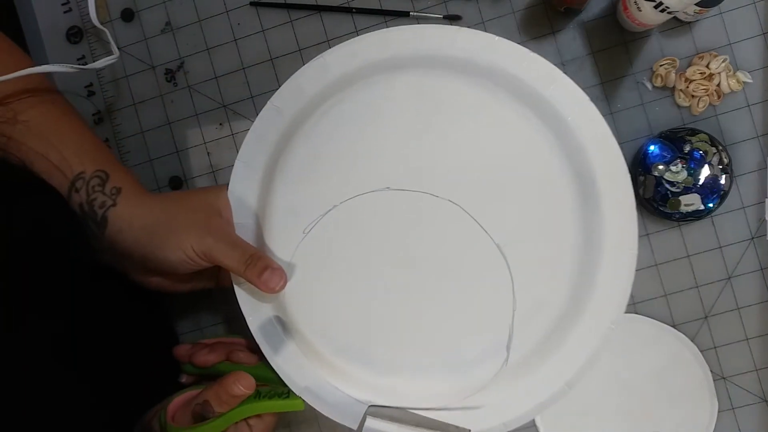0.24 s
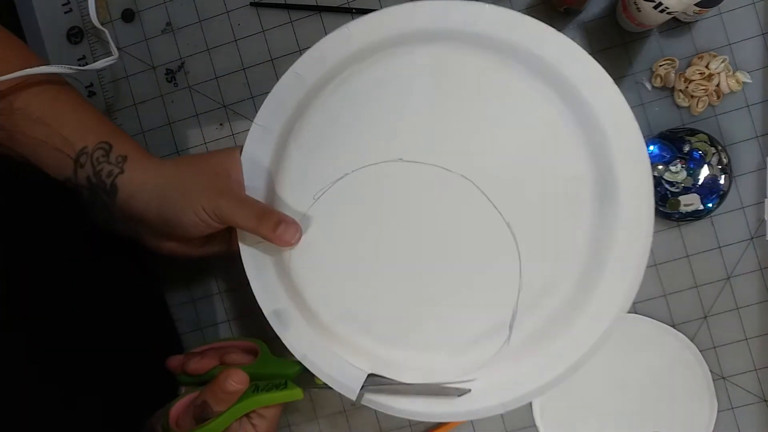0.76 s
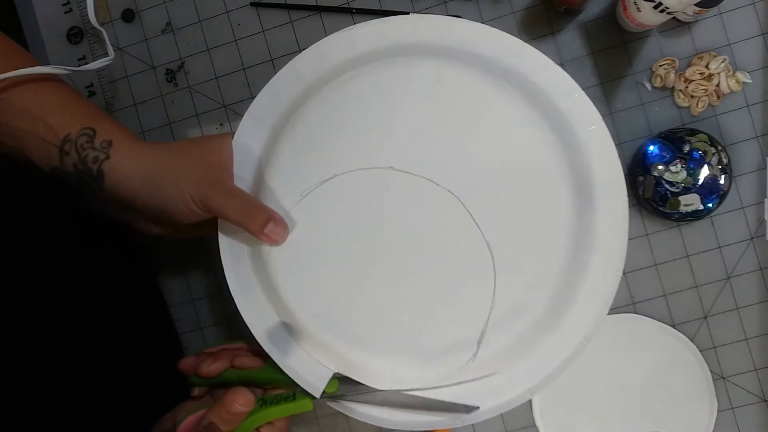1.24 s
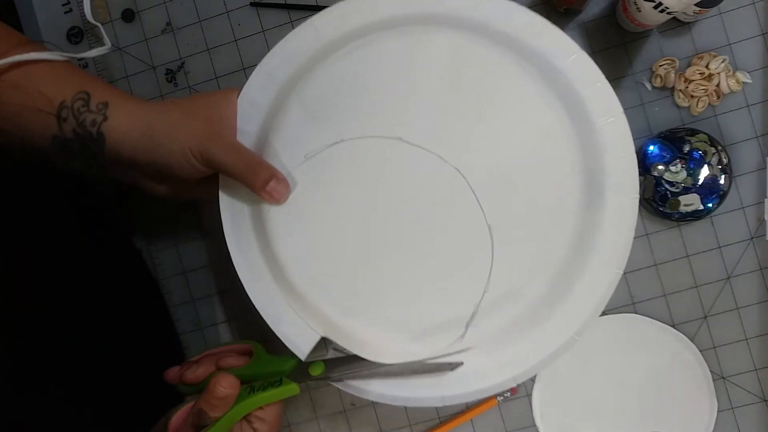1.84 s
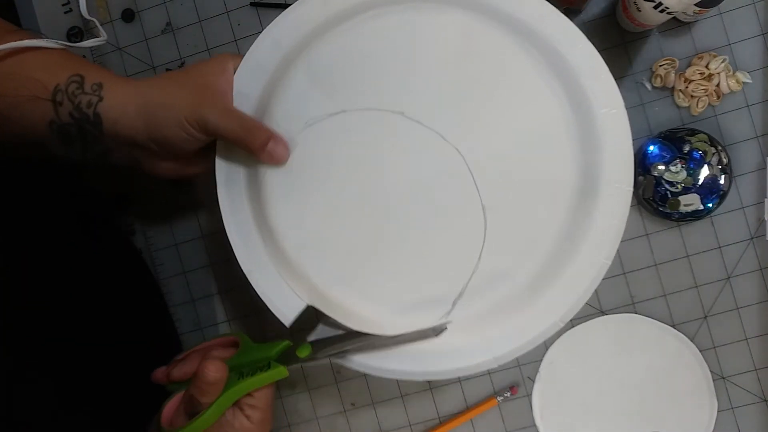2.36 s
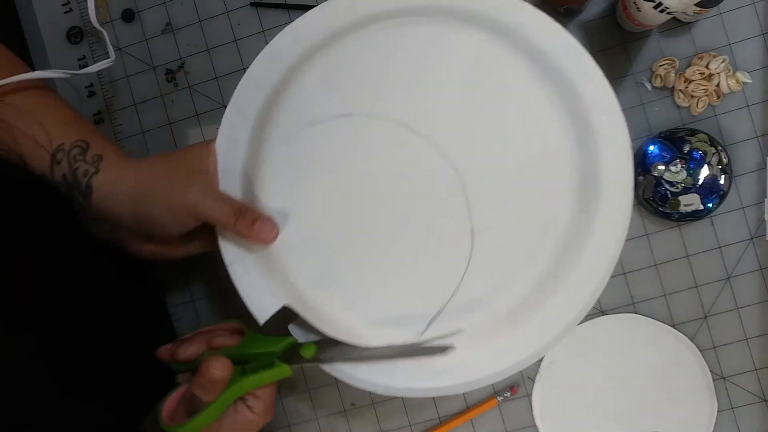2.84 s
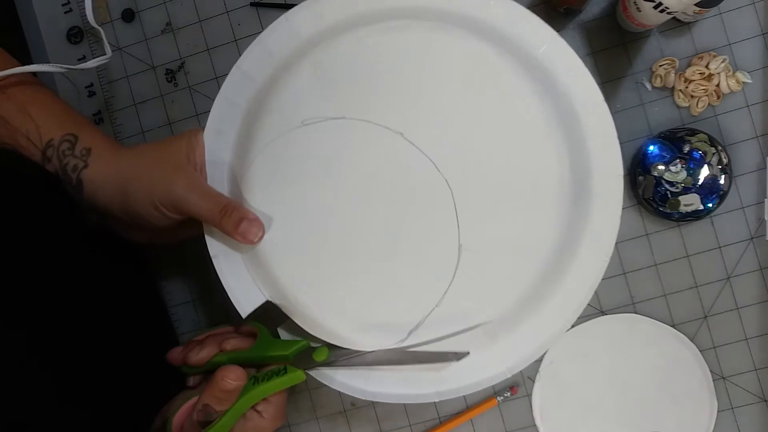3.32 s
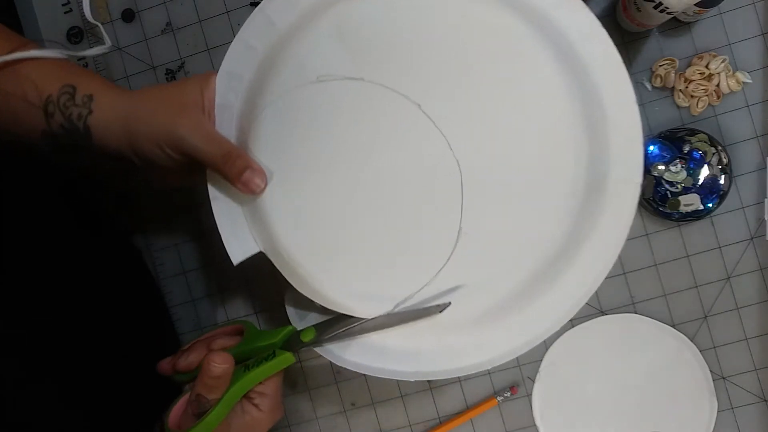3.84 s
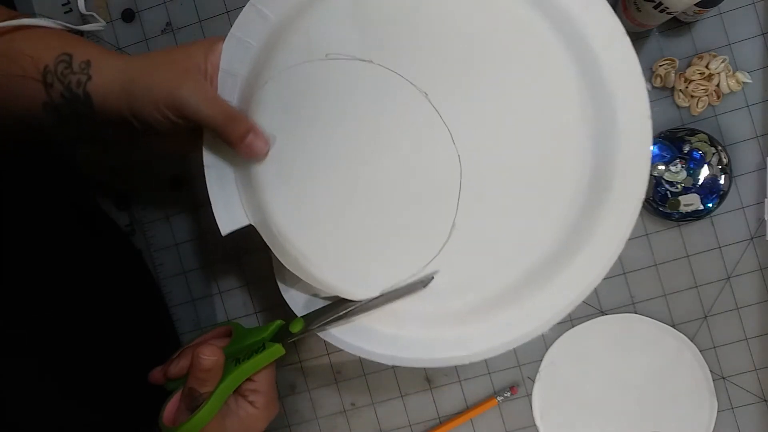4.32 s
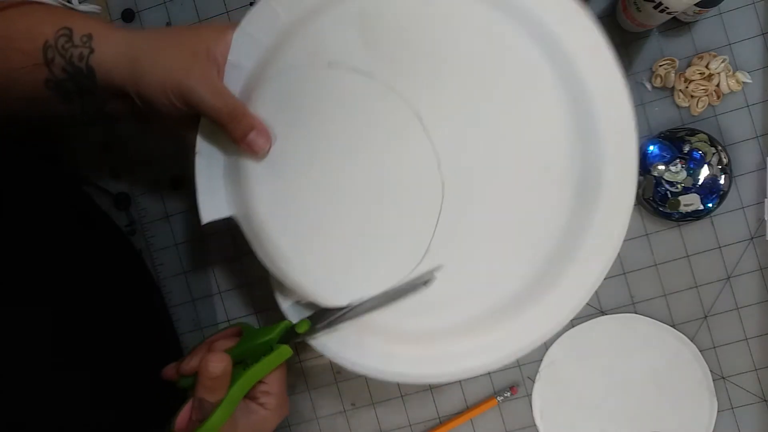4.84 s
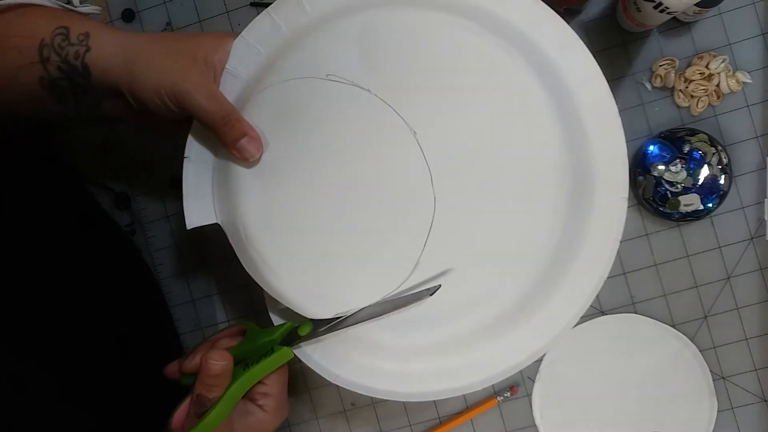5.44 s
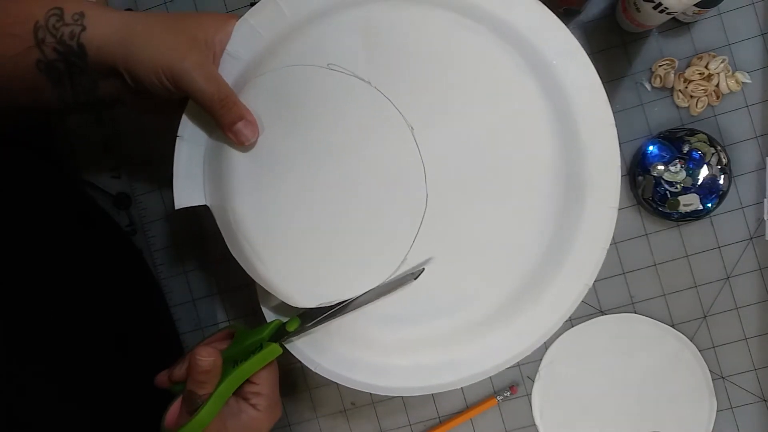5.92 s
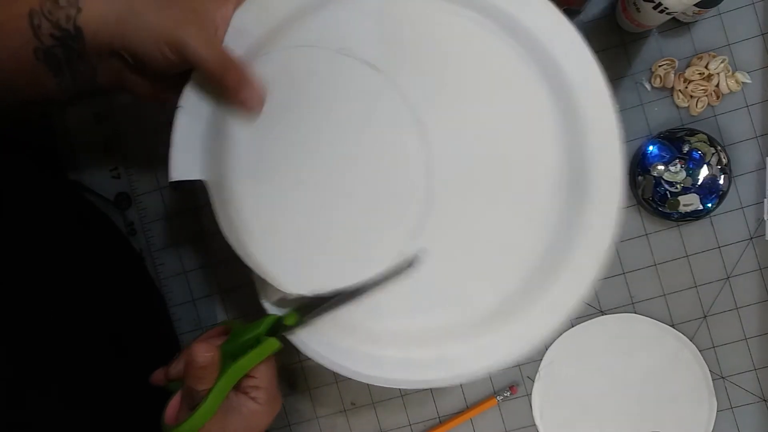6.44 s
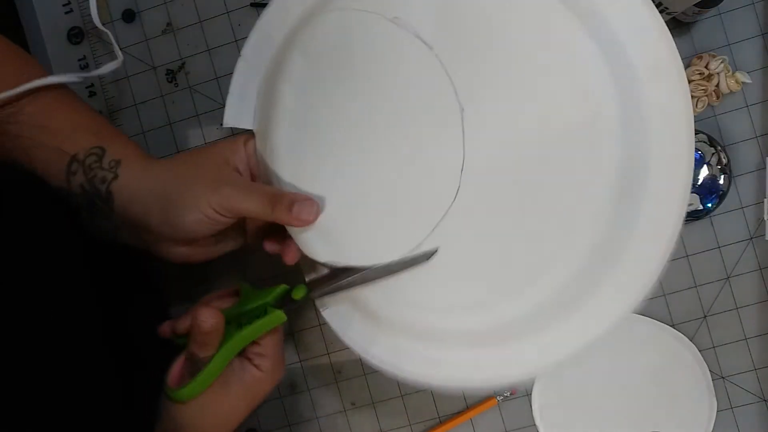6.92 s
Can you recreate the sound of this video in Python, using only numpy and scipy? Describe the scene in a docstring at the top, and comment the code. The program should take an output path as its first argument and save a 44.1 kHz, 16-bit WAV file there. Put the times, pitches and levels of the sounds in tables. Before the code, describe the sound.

Close to the microphone in a quiet room, scissors bite through a stiff paper plate. Short hollow snaps with ragged tearing come in uneven clusters, with dry scrapes as the open blades slide along the slit. A pause follows three seconds, then lighter snips, and a loud, dense burst around six seconds before it thins out. Faint hush lies underneath.

```python
"""In a quiet room, scissors cut a stiff paper plate close to a microphone.
As the blades close, the card gives way in short snaps: a jolt and ragged tearing ring the plate
and its cut edge. Between cuts the open blades slide along the slit with a dense scrape of tiny
catches. Faint fidgeting and brief rustles, short echoes and a steady hush lie underneath."""
import sys
import numpy as np
from scipy import signal
from scipy.fft import rfft, irfft
from scipy.io import wavfile
from scipy.ndimage import uniform_filter1d

SR = 44100
rng = np.random.default_rng(int(sys.argv[2]) if len(sys.argv) > 2 else 0)


def to_wav(s):
    """Save 16-bit WAV."""
    ch = np.atleast_2d(s).T  # columns
    pcm = np.round(np.clip(ch, -1, 1) * 32767)  # PCM
    wavfile.write(sys.argv[1], SR, pcm.astype(np.int16))


N = 316197

# Room and microphone noise, spectral shape: pitch_hz, relative density_db (dB per Hz)
HUSH_SPECTRUM = [(24, -64), (40, -50), (96, -22), (422, -15), (1410, -27.5), (2630, -29), (4800, -32),
                 (8130, -40), (12100, -36), (16000, -36)]
# Bending modes of the whole plate: pitch_hz, width_hz, relative level_db
PLATE_MODES = [(315, 143, -2.5), (426.6, 79, 4), (542, 41.5, 1.5), (665.4, 43, 0.5), (820, 66, 1),
               (1119, 57, -4), (1508, 66, -6)]
# Stiffer modes near the cut and in the blades: pitch_hz, width_hz, relative level_db
EDGE_MODES = [(1625, 142, 18), (1780, 49, 22.5), (2110, 227, 19), (3170, 100, 22), (4607, 730, 12),
              (6560, 530, 2)]
# Tearing fibres, spectral shape: pitch_hz, relative density_db (dB per Hz)
FIBRE_SPECTRUM = [(530, -31), (900, 10), (1410, -5.5), (2090, -4.5), (2600, 0), (4740, 0.5), (8150, -14),
                  (10100, -10), (16000, -22.5)]
# Card shifting on the blades: start_s, scrape level_db, time to peak_ms
RUSTLES = [(0.0044, -44, 5.5), (0.09, -51, 5.3), (0.596, -46.5, 12), (1.198, -46.5, 3.6), (1.327, -50, 7.4),
           (1.3607, -48, 1.9), (1.441, -60, 8.7), (1.694, -55, 11.3), (1.749, -51.5, 2.4),
           (1.843, -52, 5.4), (2.55, -59.5, 3.2), (3.264, -56, 7.8), (3.3425, -57, 7.2),
           (3.6064, -47.5, 6.2), (3.764, -53, 3.5), (3.851, -41.5, 9.6), (3.913, -43, 9.6),
           (3.966, -47, 4.1), (4.092, -61, 7.1), (4.469, -56.5, 9.8), (5.0936, -52, 5.4),
           (5.117, -50.5, 4.5), (5.245, -49, 3.2), (6.721, -48, 7), (6.758, -51, 3.8)]
# Blades or fingers sliding on card: start_s, length_s, scrape level_db, change by the end_db,
# change in the middle_db, plate drumming against scrape_db, favoured pitch_hz, lift of low edge modes_db
STROKES = [(0.788, .26, -39.5, 6, -5.5, -5, 750, 9), (2.395, 0.22, -58, 8, -12.5, -10, 800, -4),
           (2.591, 0.096, -54, -5.5, 10, -4, 594, -2), (2.707, 0.31, -36.5, -1.5, -6, -1.5, 710, -4.5),
           (4.724, 0.23, -45.5, 5.5, -4, -3.5, 800, -12), (6.394, 0.12, -56, -1, 8.5, -10.5, 794, -1),
           (6.658, 0.097, -54, 10, 4.5, -4.5, 850, -19), (6.778, 0.27, -60.5, 6, -19, 3, 810, 13),
           (6.881, 0.33, -45, -12, 3, -6, 655, -3.5)]
# The card giving way, and among these rows some knocks of the sliding blades on the plate: start_s, thud
# level_db, favoured plate pitch_hz, crack against thud_db
SNAPS = [(0.049, -29.5, 525, -2.5), (0.069, -36.5, 820, -4), (0.106, -39, 1120, -1),
         (0.171, -24.5, 520, -8), (0.242, -23.5, 710, -9), (0.373, -34, 506, -6.5), (0.386, -23, 636, 0.5),
         (0.58, -23.5, 790, -2.5), (0.614, -29, 570, 3.5), (0.638, -40.5, 1020, 5.5), (0.814, -39, 1100, 5),
         (0.844, -25.5, 750, -25), (1.197, -40.5, 760, -6.5), (1.233, -27, 716, -10),
         (1.322, -27, 475, -10.5), (1.399, -44, 600, 8.5), (1.57, -38, 650, -0.5), (1.704, -40, 764, 1),
         (2.046, -21.5, 627, -9.5), (2.135, -38, 450, -5.5), (2.202, -23.5, 450, -9.5),
         (2.27, -35.5, 493, -3), (2.323, -42, 470, 2), (2.356, -32, 493, -3.5), (2.382, -27.5, 433, -7),
         (2.799, -23.5, 664, -32), (2.884, -26.5, 600, -9), (2.93, -27.5, 500, -10),
         (3.616, -29.5, 650, -3), (3.667, -30.5, 590, 1), (3.816, -43, 404, 4.5), (3.861, -25, 835, -13),
         (3.928, -25.5, 755, -13), (4.004, -37, 730, -2.5), (4.133, -33.5, 670, -4.5),
         (4.171, -29, 460, -6), (4.223, -31, 443, -6.5), (4.262, -31, 544, -5.5), (4.308, -31, 770, -8),
         (4.377, -39.5, 507, -2.5), (4.503, -44.5, 520, 0), (4.572, -34, 555, -9.5), (4.776, -29, 730, -8),
         (4.817, -31, 940, -7), (4.884, -36, 624, -1), (5.161, -38.5, 423, -4), (5.256, -34, 430, -8.5),
         (5.284, -32, 472, -7), (5.335, -31, 381, -6.5), (5.453, -28, 407, -5.5), (5.521, -20, 512, -13),
         (5.574, -36, 505, -5.5), (5.603, -30, 388, -7), (5.694, -38.5, 670, -6), (5.741, -24.5, 414, -6.5),
         (5.86, -15, 454, -12.5), (5.9, -22, 430, -14.5), (5.98, -19, 430, -10), (6.053, -23, 468, -12),
         (6.083, -22.5, 430, -6.5), (6.14, -24.5, 475, -10), (6.22, -35.5, 820, -6),
         (6.2509, -15, 440, -11.5), (6.435, -36.5, 756, 2), (6.476, -37, 830, -4), (6.611, -45.5, 480, 1.5),
         (6.828, -40, 800, -18), (6.934, -25.5, 680, -15), (6.998, -34.5, 440, -9), (7.079, -38.5, 483, 2)]
# Crack colour as the cut moves round the plate: time_s, upper treble lift_db, lift of low edge modes_db
SHARPNESS = [(0, -18, 19.5), (2.2, 1, 1), (3.2, -4, -2), (4.3, 3.5, 10.5), (5.8, -1, -1.5), (6.3, -4, 0)]

HUSH_DB = -64.5  # before the microphone's bass cut
LOW_EDGE_HZ = 3500  # edge modes below this count as low
SLIDE_FALL_DB = -5  # mode level per squared octave away from the favoured pitch of a slide
ATTACK_S, RELEASE_S, QUIET_DB = 0.028, 0.082, -26  # a stroke swells out of quiet and dies away
TEAR_MS, CRACK_MS = 5.5, 3.29  # how long a snap shakes the plate; decay time of its crack
THUMP_HZ, THUMP_DB = 219, -18.5  # the whole plate jumps in the hand at each snap
BAND_LIMIT_HZ = 15850


def gain_of(db):
    """Decibels to amplitude."""
    return 10 ** (np.asarray(db) / 20)


def evened(x):
    """Scales to rms 1."""
    return x / np.sqrt(np.mean(x ** 2) + 1e-20)


def filtered(x, taps):
    """Filters with taps of unit energy, so white noise keeps its power."""
    return signal.oaconvolve(x, taps / np.linalg.norm(taps))[:len(x)]


def spectrum_gain(hz, points):
    """Reads a spectrum of (Hz, dB) points as gains, straight in dB against log pitch."""
    point_hz, db = np.transpose(points)
    return gain_of(np.interp(np.log(hz + 1), np.log(point_hz + 1), db))


def colour(x, points):
    """Causal filter with a given spectrum, so nothing sounds before a click."""
    log_gain = np.log(spectrum_gain(np.fft.rfftfreq(512, 1 / SR), points))
    full = np.r_[log_gain, log_gain[-2:0:-1]]
    minimum_phase = -signal.hilbert(full).imag
    return filtered(x, np.fft.ifft(np.exp(full + 1j * minimum_phase)).real)


def ring(x, hz, width_hz):
    """One decaying mode, gain 1 at its peak; a wider mode dies faster."""
    r = np.exp(-np.pi * width_hz / SR)
    return 2 * signal.lfilter([1 - r], [1, -r * np.exp(2j * np.pi * hz / SR)], x).real


def slow_drift(samples):
    """Smooth random wander of rms 1; more samples make it slower."""
    noise = rng.standard_normal(N)
    return evened(uniform_filter1d(uniform_filter1d(noise, size=samples), size=samples))


def hush():
    """Steady room and microphone noise, wavering slightly in level."""
    hz = np.fft.rfftfreq(N, 1 / SR)
    noise = irfft(rfft(rng.standard_normal(N)) * spectrum_gain(hz, HUSH_SPECTRUM), N)
    waver_db = evened(uniform_filter1d(rng.standard_normal(N), size=4000))
    return gain_of(HUSH_DB + waver_db) * evened(noise)


def room(x, t60_s=0.13):
    """Sparse echoes of random sign from table and walls."""
    taps = np.zeros(SR // 2)
    at = np.arange(120, len(taps) - 20, 20)
    at += rng.integers(0, 20, len(at))
    taps[at] = rng.choice([-1., 1.], len(at)) * gain_of(-60 * at / SR / t60_s)
    return filtered(x, taps)


def flexing(x, patchy_db=1.6):
    """The plate bends in the hand, so its colour drifts in patches of pitch and time."""
    z = signal.stft(x, nperseg=256, noverlap=192)[2]
    patches = rng.standard_normal(z.shape)
    for _ in range(2):
        patches = uniform_filter1d(patches, size=4, axis=0)
        patches = uniform_filter1d(patches, size=24, axis=1)
    return signal.istft(z * gain_of(patchy_db * evened(patches)), nperseg=256, noverlap=192)[1][:N]


def low_lift(db):
    """Lift in dB of each edge mode: only the low ones change."""
    return db * (np.transpose(EDGE_MODES)[0] < LOW_EDGE_HZ)


def edge(force, lift_db=0, fizz_db=3):
    """The cut edge: stiff modes over the broad fizz of fibres."""
    click = np.r_[1., np.zeros(2047)]
    signs = (-1) ** np.arange(len(EDGE_MODES))
    levels = gain_of(np.transpose(EDGE_MODES)[2] + lift_db) * signs
    modes = sum(g * ring(click, hz, width) for g, (hz, width, _) in zip(levels, EDGE_MODES))
    fizz = colour(click, FIBRE_SPECTRUM)
    return filtered(force, modes / np.linalg.norm(modes) + gain_of(fizz_db) * fizz)


def drum(force, pitch_hz):
    """Rubbing drums mostly the plate modes near the favoured pitch."""
    click = np.r_[1., np.zeros(4095)]
    taps = 0
    for k, (hz, width, db) in enumerate(PLATE_MODES):
        fall_db = SLIDE_FALL_DB * np.log2(hz / pitch_hz) ** 2
        taps = taps + (-1) ** k * gain_of(db + fall_db) * ring(click, hz, width)
    return filtered(force, taps)


def light_scrape(t, fidget_db=-72, swing_db=6.0, strain_db=-22, strain_ms=7):
    """Scrape level outside the strokes: fidgeting hands, rustles, and card straining before snaps."""
    level = gain_of(fidget_db + swing_db * slow_drift(900))
    for start, db, peak_ms in RUSTLES:
        u = np.maximum(t - start, 0) * 1000 / peak_ms
        level += gain_of(db) * u * np.exp(1 - u)  # swells and fades
    for start, thud_db, _, crack_rel_db in SNAPS:
        before = slice(max(round((start - .05) * SR), 0), round(start * SR))
        build_up = np.exp((t[before] - start) * 1000 / strain_ms)
        level[before] += gain_of(thud_db + crack_rel_db + strain_db) * build_up
    return level


def stroke(t, start, length, db, change_db, middle_db):
    """Level of one slide: attack, a hold that drifts and sags or swells in the middle, release."""
    u = np.clip((t - start) / length, 0, 1)
    edges = np.minimum(np.minimum((t - start) / ATTACK_S, (start + length - t) / RELEASE_S), 1)
    hold_db = db + change_db * u + middle_db * np.sin(np.pi * u) ** 2
    return (edges > 0) * gain_of(hold_db + QUIET_DB * (1 - edges) ** 2)


def rub(grains_per_s=9000, grain_db=2, flicker_db=1.5, judder_db=3, slide_fizz_db=2):
    """Dense catches of blade on card drive the cut edge and the plate."""
    t = np.arange(N) / SR
    draw = rng.random(N) - .5
    size = np.minimum(rng.exponential(1, N), 4)
    caught = abs(draw) < grains_per_s / SR / 2
    catches = evened(np.sign(draw) * gain_of(grain_db * size) * caught)
    force = catches * gain_of(flicker_db * slow_drift(200))
    # the card sticks and slips, knocking the plate unevenly
    judder = force * evened(gain_of(judder_db * slow_drift(120)))
    light = force * light_scrape(t)
    out = edge(light) + drum(light, pitch_hz=790)
    for *row, drum_db, pitch_hz, lift_db in STROKES:
        span = slice(round(row[0] * SR), round((row[0] + row[1] + .1) * SR))
        level = stroke(t[span], *row)
        out[span] += edge(force[span] * level, low_lift(lift_db), slide_fizz_db)
        out[span] += drum(judder[span] * level * gain_of(drum_db), pitch_hz)
    return out


def thud(force, pitch_hz, chance, spread_octaves=0.29, scatter_db=3):
    """A snap drums the plate modes near its favoured pitch, each with a chance level."""
    out = 0
    for k, (hz, width, db) in enumerate(PLATE_MODES):
        near_db = -3.5 * min((np.log2(hz / pitch_hz) / spread_octaves) ** 2, 2)
        out = out + (-1) ** k * gain_of(db + near_db + scatter_db * chance[k]) * ring(force, hz, width)
    return out * 0.7 / np.abs(out).max()


def snaps(crack_db=2, after_db=-16, after_ms=20, jolt_ms=0.86, ragged_db=5, tick_db=-5):
    """Each snap is a jolt and a short ragged tearing: plate thud, hand thump and edge crack."""
    t, out = np.arange(6000) / SR, np.zeros(N + 6000)
    ms, tear = t * 1000, t * 1000 / TEAR_MS
    shape = (len(SNAPS), len(t))
    noise = rng.standard_normal(shape) * np.minimum(rng.exponential(1, shape), 3)  # gritty
    rags = evened(uniform_filter1d(rng.standard_normal(shape), size=70, axis=1))  # fibres part in bunches
    grits = noise * gain_of(ragged_db * np.tanh(rags))
    chances = rng.standard_normal((len(SNAPS), len(PLATE_MODES) + len(EDGE_MODES)))
    when, treble_db, low_db = np.transpose(SHARPNESS)
    upper = signal.butter(1, 5000, "high", fs=SR)

    creak = gain_of(after_db) * np.exp(-ms / after_ms) * np.minimum(tear, 1)  # the slit keeps creaking
    tearing = (1 - np.exp(-tear / 0.82)) * np.exp(-tear ** 2.13) + creak
    burst = np.minimum(ms / 2.57, 1) ** 2 * np.exp(-ms / CRACK_MS)  # fibres part within moments
    crack_shape = creak + gain_of(tick_db) * burst
    jolt = np.sin(np.pi * np.minimum(ms / jolt_ms, 1)) * 0.64
    thump = gain_of(THUMP_DB) * np.sin(2 * np.pi * THUMP_HZ * t) * np.exp(-2.5 * THUMP_HZ * t)
    for (start, thud_db, pitch_hz, crack_rel_db), grit, chance in zip(SNAPS, grits, chances):
        body = thud(jolt + tearing * grit, pitch_hz, chance) - thump
        lift_db = 2 * chance[len(PLATE_MODES):] + low_lift(np.interp(start, when, low_db))
        crack = edge(crack_shape * grit[::-1], lift_db)
        treble_gain = gain_of(np.interp(start, when, treble_db))
        crack += (treble_gain - 1) * signal.lfilter(*upper, crack)
        snap = body + gain_of(crack_db + crack_rel_db) * crack
        out[round(start * SR):][:len(t)] += gain_of(thud_db) * snap
    return out[:N]


def scene():
    """Plate sounds, their echoes and the hush, the same on both channels."""
    plate = flexing(snaps() + rub())
    mono = plate + gain_of(-14.5) * room(plate) + hush()
    return np.array([mono, mono])


def record(dry):
    """The microphone thins the bass; then a steep filter limits the band."""
    thin = signal.sosfilt(signal.butter(1, 350, "high", fs=SR, output="sos"), dry)
    low_pass = signal.firwin(511, BAND_LIMIT_HZ, window=("kaiser", 9), fs=SR)
    return signal.oaconvolve(thin, low_pass[None], "same")


dry = scene()
out = record(dry)
to_wav(out)
```